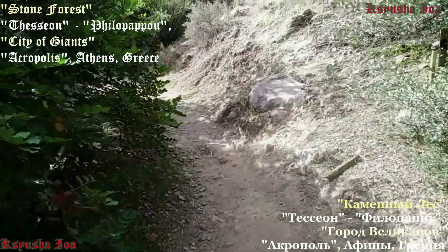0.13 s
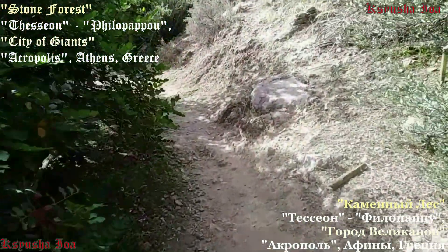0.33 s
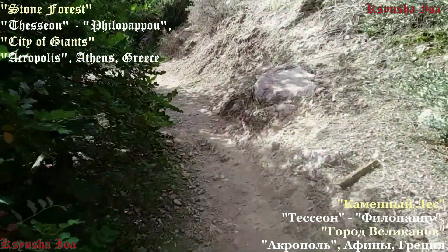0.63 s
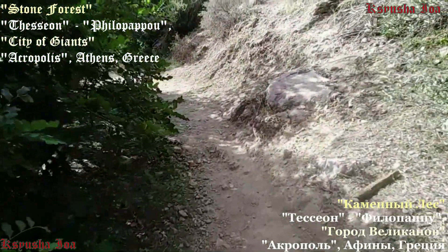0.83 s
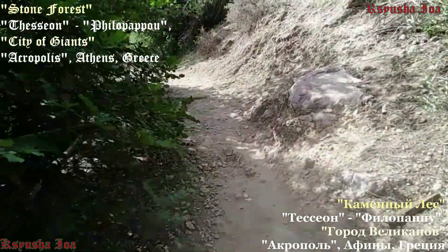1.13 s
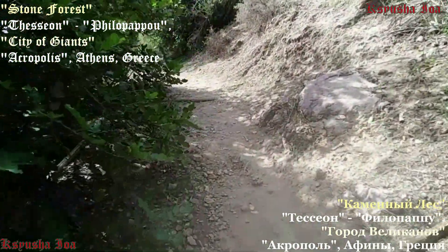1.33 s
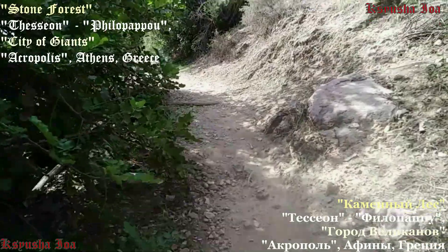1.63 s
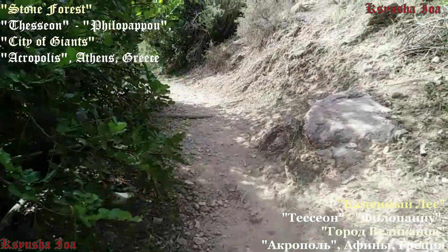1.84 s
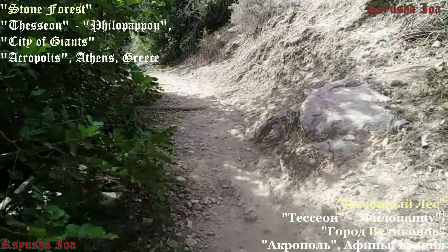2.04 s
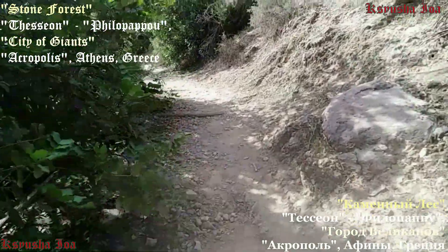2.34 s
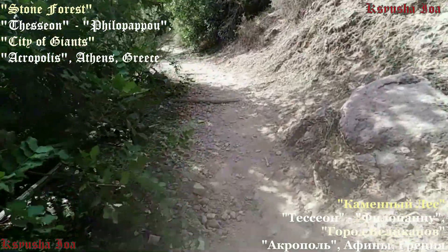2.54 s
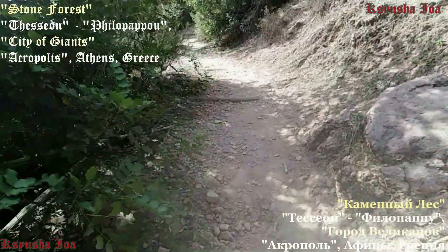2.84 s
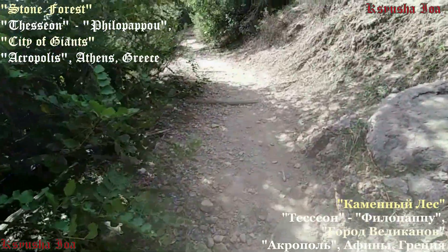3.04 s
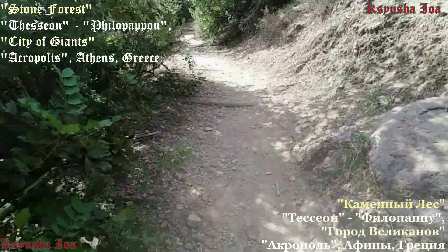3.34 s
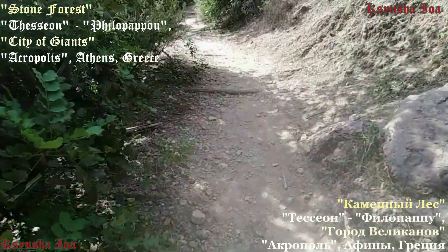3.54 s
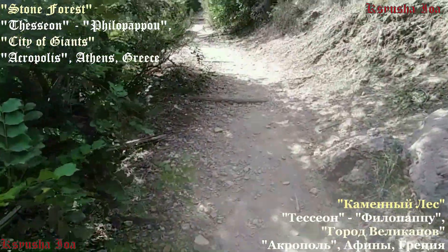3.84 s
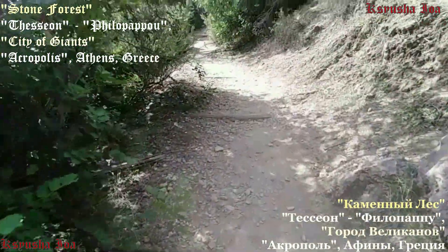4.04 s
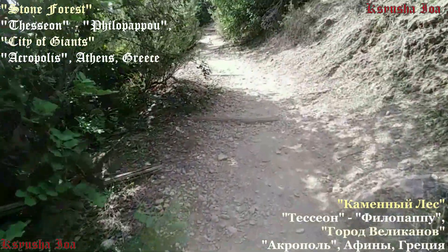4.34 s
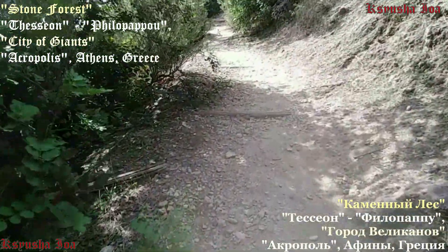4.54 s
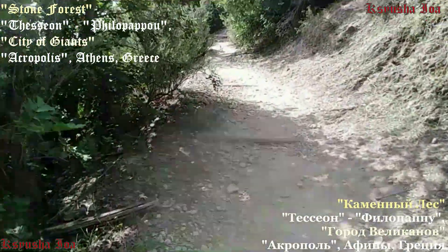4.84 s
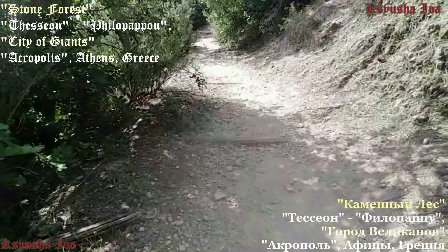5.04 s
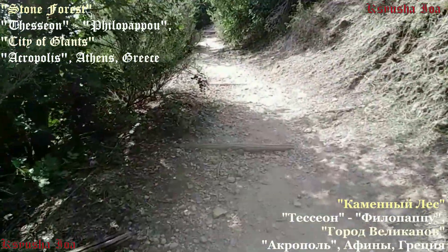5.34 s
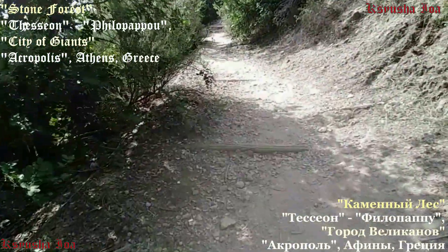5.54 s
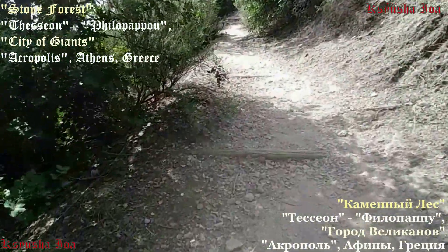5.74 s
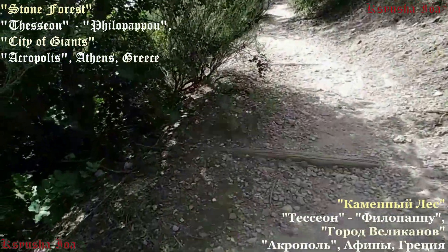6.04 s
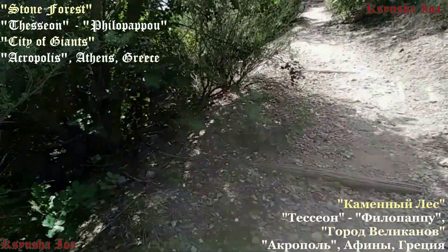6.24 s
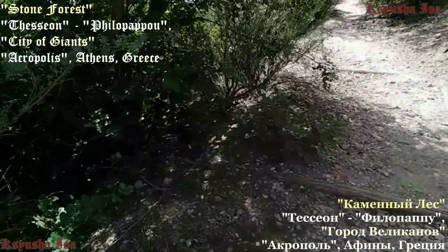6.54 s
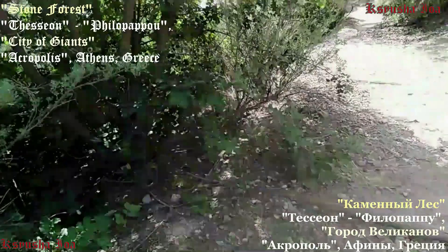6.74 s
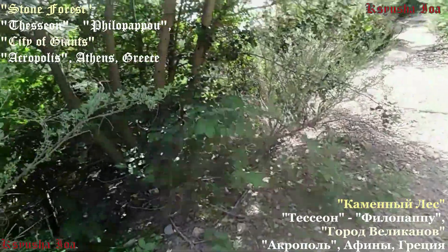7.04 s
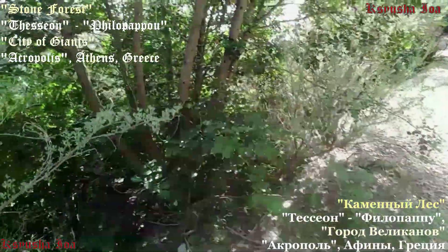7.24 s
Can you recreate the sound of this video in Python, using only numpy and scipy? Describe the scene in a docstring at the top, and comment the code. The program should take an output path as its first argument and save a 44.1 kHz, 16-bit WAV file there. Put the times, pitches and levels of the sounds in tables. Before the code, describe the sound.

Woodland birds around a path, heard in stereo, the nearest almost dry and the deeper singers blurred by leafy echoes. From 0 to 1.25 s a small bird trills in fast bent high sweeps, with a hoarse crow caw at the start, a nasal jackdaw-like yelp and sharp ticks. A second hoarse caw spans 1.2-1.75 s amid more yelps and a clear chirp. Buzzy thrush-like whistles follow, then a run of quick falling notes from 2.3 to 2.65 s and a short third caw. A thin, far mew slides down about an octave at 3.1-4 s. Sparse pips, faint twitters and yelps continue, with strong yelps at 3.4 and 5.45 s. A longer, brighter rattling caw fills 6.15-6.9 s, with the loudest yelps around 6.5 s, then soft trills and pips to 7.4 s. Faint distant chorus, steady air, deep hum and low buffeting, which eases between about 4.2 and 5.8 s, lie underneath.

```python
"""Jackdaw-like birds yelp close to the microphones on a wooded path: harmonics whose pitch may break. A crow
caws four times as a rattling pulse train through a throat; a small bird trills in fast bent sweeps. A thrush-
like bird whistles deeper among the trees, one far mew slides down, and a few brief clicks sound. Decaying noise
tails blur and echo the calls among the trees; shaped noise makes the distant chorus, the still air, the deep
hum and the low buffeting."""
import sys
import numpy as np
from scipy import signal
from scipy.fft import rfft, irfft
from scipy.io import wavfile
from scipy.ndimage import uniform_filter1d

SR = 44100
rng = np.random.default_rng(int(sys.argv[2]) if len(sys.argv) > 2 else 0)


def generate_wav(sig):
    """Save sig (samples, or channels by samples) to the path in sys.argv[1] as 16-bit PCM at SR."""
    pcm = np.round(np.clip(np.atleast_2d(sig).T, -1, 1) * 32767).astype(np.int16)
    wavfile.write(sys.argv[1], SR, pcm)


N = 325899
TIME = np.arange(N) / SR


def amp(db):
    """Decibels to gain."""
    return 10 ** (np.asarray(db) / 20)


def unit(x):
    """Scales to rms 1."""
    return x / np.sqrt(np.mean(abs(x) ** 2) + 1e-20)


def read(points, hz):
    """Reads a spectrum on a log-frequency axis."""
    f, value = np.transpose(points)
    return np.interp(np.log(hz + 1), np.log(f + 1), value)


def follow(rows, t):
    """Reads every column of a curve at the times t."""
    s, *columns = np.transpose(rows)
    return [np.interp(t, s, c) for c in columns]


def add(mix, s, sound):
    """Mixes a stereo sound in at time s."""
    part = mix[:, max(round(s * SR), 0):][:, :sound.shape[1]]
    part += sound[:, :part.shape[1]]


def wander(t, rate_hz):
    """Smooth chance of rms 1 along t, for sounds up to a second long."""
    hz = np.fft.rfftfreq(SR, 1 / SR)
    smooth = irfft(rfft(rng.standard_normal(SR)) * np.exp(-(hz / rate_hz) ** 2))
    return np.resize(unit(smooth), len(t))


def arch(length, start, middle, end):
    """Time and pitch of a note that bends through three pitches."""
    t = np.arange(int(length * SR)) / SR
    parabola = np.polyfit([0, .5, 1], [start, middle, end], 2)
    return t, np.polyval(parabola, t / length)


def swell(t, rise, fall):
    """Rounded onset and ending of a note, in seconds."""
    onset = np.sin(np.pi / 2 * np.clip(t / rise, 0, 1)) ** 2
    ending = np.sin(np.pi / 2 * np.clip((t[-1] - t) / fall, 0, 1)) ** 2
    return onset * ending


def voice(hz, partials, pan_db, lead_ms):
    """Harmonics of a pitch curve with the given gains, as they reach the two microphones."""
    side = np.array([[.5], [-.5]])  # left, right
    lead = lead_ms / 1000
    turn = np.exp(2j * np.pi * (np.cumsum(hz) / SR + side * lead * hz))
    wave, overtone = 0, 1
    for k, gain in enumerate(partials, 1):
        overtone = overtone * turn * np.exp(1j * k)  # each harmonic has its own phase
        wave = wave + (gain * overtone).real * (k * hz < SR / 2)
    return np.sqrt(2) * amp(side * pan_db) * wave


# likeness of the air noise at the two microphones: (f/Hz, coherence from 0 to 1)
LIKENESS = [(100, 1), (450, 0.91), (1000, 0.64), (1900, 0.0022), (4000, 0), (8000, 0.28)]


def wash(spectrum, patchy_db):
    """Stereo noise of a given colour with drifting patches; alike on both sides in the bass."""
    hz = np.fft.rfftfreq(1024, 1 / SR)
    a, b, c, d, patches = rng.standard_normal((5, len(hz), N // 256 + 5))
    patches = uniform_filter1d(patches, size=14, axis=1)  # smooth in time
    patches = unit(uniform_filter1d(patches, size=7, axis=0))  # and in frequency
    same = np.clip(read(LIKENESS, hz), -1, 1)[:, None]
    left = a + 1j * b
    right = same * left + np.sqrt(1 - same ** 2) * (c + 1j * d)
    z = np.array([left, right])
    z *= amp(read(spectrum, hz)[:, None] + patchy_db * patches)
    return unit(signal.istft(z, nperseg=1024, noverlap=768)[1][:, :N])


# colour of the still air: (f/Hz, relative level per Hz/dB)
AIR = [(35, -30), (60, 14.5), (108, -11), (173, -8.5), (425, -9.5), (692, -16), (940, -14), (1500, -17.5),
       (1700, -14), (1960, -22), (2170, -9.5), (2830, -3.5), (3680, -11.5), (6010, -26.5), (7830, -34.5),
       (10200, -34), (17200, -120)]


def still_air():
    """Steady noise of the place, shaped in frequency."""
    return amp(-43.5) * wash(AIR, patchy_db=3.0)


# colour of the far birds: (f/Hz, relative level per Hz/dB)
CHORUS = [(1200, -25), (1900, -2.5), (2600, 7), (3300, -3), (4300, -5), (6000, -53), (9000, -50.5)]
# blur of far song and lingering echo, before the chorus trim: (t/s, level/dB)
CHORUS_LEVEL = [(0, -20), (.78, -30), (1.4, -43), (2.53, -57), (2.78, -21), (3.09, -39), (3.52, -36),
                (3.8, -50.5), (4.45, -45), (5.45, -36.5), (6.24, -58), (6.68, -29), (6.96, -44.5),
                (7.39, -31)]


def far_chorus(trim_db=-3):
    """Many far birds merge into coloured noise whose level comes and goes."""
    return amp(follow(CHORUS_LEVEL, TIME)[0] + trim_db) * wash(CHORUS, patchy_db=2.5)


# deep hum of the open air: (f/Hz, relative level per Hz/dB)
LOW_AIR = [(15, -15.5), (40, -7.5), (60, -3.5), (90, -16), (200, -37.5)]


def low_hum():
    """Steady deep hum of the open air, as low noise."""
    return amp(-58) * wash(LOW_AIR, patchy_db=2.0)


# colour of the low buffeting: (f/Hz, relative level per Hz/dB)
RUMBLE = [(3, -5), (10, 6.5), (18, -5.5), (30, -16), (60, -20.5), (120, -42), (300, -65)]
# strength of the low buffeting: (t/s, level/dB)
RUMBLE_LEVEL = [(0, -39), (.85, -32.5), (1.45, -29.5), (2.3, -34), (3.3, -34), (3.75, -35), (4.12, -35.5),
                (4.24, -59), (5.6, -69), (5.86, -43.5), (6.02, -56), (6.2, -39), (7, -31.5), (7.39, -35.5)]


def buffeting():
    """Slow low rumble of air, the same at both microphones."""
    colour = amp(read(RUMBLE, np.fft.rfftfreq(N, 1 / SR)))
    rumble = unit(irfft(rfft(rng.standard_normal(N)) * colour, N))
    return amp(follow(RUMBLE_LEVEL, TIME)[0]) * rumble


def caw(rows, throat, rest_hz, rough, jitter, flutter_hz, flutter, lumpy, level_db, lead_ms):
    """A rattling pulse train through a throat that shifts as the beak opens; higher harmonics are rougher."""
    t = np.arange(rows[0][0], rows[-1][0], 1 / SR)
    pitch_hz, effort_db, resonance_hz = follow(rows, t)
    rattle_hz = flutter_hz * (1 + lumpy * wander(t, 30))
    rattle = signal.sawtooth(2 * np.pi * np.cumsum(rattle_hz) / SR, .8)
    depth = np.linspace(*flutter, len(t))  # the rattle changes from the start of the call to its end
    hz = pitch_hz * (1 + depth * rattle + jitter * wander(t, 300))
    mouth = np.sqrt(resonance_hz / rest_hz)  # the whole throat shifts by the root of the ratio
    partials = []
    for k in range(1, 32):
        scatter = rough * k / 4 * (wander(t, 130) + 1j * wander(t, 130))
        partials.append(amp(read(throat, k * hz / mouth)) * unit(1 + scatter))
    throb = 1 + lumpy * (rattle + .6 * wander(t, 60))
    tone = unit(voice(hz, partials, 0, lead_ms) * throb)
    return t[0], amp(effort_db + level_db) * swell(t - t[0], 0.0023, 0.023) * tone


# one curve a caw: (t/s, pitch f/Hz, effort before the call's trim/dB, main throat resonance f/Hz)
CAWS = [
    [(0, 279.7, -15.5, 1170), (.09, 260.4, -21.5, 1317), (.16, 245.7, -22, 1200), (.23, 233.3, -23.5, 1200),
     (.365, 220.3, -25.5, 1240), (.4, 217, -35, 1220)],
    [(1.215, 291, -33.5, 1340), (1.25, 293.6, -19, 1426), (1.34, 302.2, -22, 1200),
     (1.43, 276, -19.5, 1380), (1.51, 269.3, -22, 1395), (1.62, 239.3, -22.5, 1310),
     (1.72, 219, -30.5, 1140), (1.76, 211, -36.5, 1150)],
    [(2.655, 242.4, -35, 1170), (2.685, 250.4, -29.5, 970), (2.76, 267.5, -21.5, 1156),
     (2.835, 278, -22, 1305), (2.9, 241, -23, 1080), (2.95, 234.7, -26.5, 1090), (3, 222, -33, 1220)],
    [(6.135, 260, -45, 1310), (6.169, 273, -29, 1360), (6.22, 318.4, -23.5, 1440),
     (6.3, 321.6, -22.5, 1460), (6.42, 313.3, -22, 1480), (6.52, 314.6, -21.5, 1560),
     (6.7, 292.5, -22, 1610), (6.88, 265.6, -22, 1345), (6.93, 248, -34, 1330)],
]
# throat of the three hoarse caws: (f/Hz, level/dB)
HOARSE_THROAT = [(250, -36.5), (550, -30), (800, -13.5), (1050, -4.5), (1220, 9), (1500, -5.5), (1900, -8),
                 (2500, -8.5), (3400, -22.5), (5000, -21), (7000, -61.5), (10000, -75)]
# throat of the long bright caw: (f/Hz, level/dB)
BRIGHT_THROAT = [(300, -38), (650, -35.5), (930, -11), (1250, -8), (1550, 6), (1900, -2), (2200, -5),
                 (2600, -0.5), (3500, -24), (4300, -22), (5200, -10.5), (6500, -26.5), (9000, -48.5)]


def crow():
    """Three hoarse, lumpy caws and one long, brighter one with an even rattle."""
    out = np.zeros((2, N))
    hoarse = dict(rough=.32, jitter=.018, flutter_hz=31, flutter=(.06, .04), lumpy=.3)
    even = dict(rough=.18, jitter=.01, flutter_hz=54, flutter=(.042, .08), lumpy=.05)
    for rows in CAWS[:-1]:
        add(out, *caw(rows, HOARSE_THROAT, rest_hz=1238, level_db=1.5, lead_ms=0.0067, **hoarse))
    add(out, *caw(CAWS[-1], BRIGHT_THROAT, rest_hz=1626, level_db=2, lead_ms=0.0018, **even))
    return out


def thicket(x, t60=0.27):
    """Nearby foliage blurs a call with a short spray of reflections."""
    t = np.arange(SR // 3) / SR
    spray = rng.standard_normal((2, len(t))) * amp(-60 * t / t60)
    spray *= t > .003  # the first reflection comes after 3 ms
    return signal.fftconvolve(x, spray / np.linalg.norm(spray[0]), axes=1)[:, :N]


# echo among the trees: (f/Hz, time to die by 60 dB/s)
WOOD = [(500, 0.89), (1300, 1.1), (2700, 1.57), (4200, 1.5), (6000, 0.98), (10000, 0.2)]


def trees(x, build_s=0.0013):
    """Trunks and leaves scatter a tail, different on each side, each band dying at its own speed."""
    hz, t, z = signal.stft(rng.standard_normal((2, 2 * SR)), SR, nperseg=256)
    t60 = read(WOOD, hz)[:, None]
    z = z * amp(-60 * t / t60) * (1 - np.exp(-t / build_s))
    tail = signal.istft(z, SR, nperseg=256)[1]
    return signal.fftconvolve(x.mean(0)[None], tail / np.linalg.norm(tail[0]), axes=1)[:, :N]


def chirp(length, pitches, db, pan_db, lead_ms, jitter=0.0081, rise=0.007, fall=0.014, overtone_db=-54):
    """A nearly pure sweep with rounded ends and a slightly uneven level."""
    t, hz = arch(length, *pitches)
    tone = voice(hz * (1 + jitter * wander(t, 500)), [1, amp(overtone_db)], pan_db, lead_ms)
    return amp(db) * unit(swell(t, rise, fall) * (1 + 0.23 * wander(t, 160))) * tone


# runs of the trill, levels before the trill's trim: (first t/s, last t/s, syllables, pitch scale,
# first level/dB, last level/dB, first left-right/dB, last left-right/dB, left lead/ms, kind of syllable)
TRILLS = [(0.019, .258, 4, 0.99, -17, -16, 3.5, 0, 0.033, "hook"),
          (0.335, 0.542, 4, 1, -19.5, -19.5, -3, -3, -0.011, "sweep"),
          (0.611, 1.246, 10, 0.99, -19.5, -30, -3, -2.5, -0.019, "sweep"),
          (6.741, 6.902, 3, 1, -28, -31, 0, .3, -0.028, "hook"),
          (6.981, 7.137, 3, 0.96, -25.5, -25.5, 1, 1, -0.044, "hook"),
          (7.213, 7.365, 3, 0.93, -30, -36, 1, -.5, -0.031, "sweep")]
# strokes of each kind, before the run's pitch scale:
# (delay t/s, length t/s, start f/Hz, middle f/Hz, end f/Hz, level relative to the run/dB)
SYLLABLES = {"hook": [(0, .036, 3860, 5100, 5250, 0), (.033, 0.025, 6760, 5450, 3900, -9.5)],
             "sweep": [(0.00098, .038, 4100, 5230, 6530, 0.5)]}


def trills(trim_db=-1.0):
    """Evenly repeated syllables: two-stroke hooks, or plain upward sweeps."""
    out = np.zeros((2, N))
    for first, last, count, scale, first_db, last_db, first_pan, last_pan, lead_ms, kind in TRILLS:
        for u in np.linspace(0, 1, round(count)):
            start = first + u * (last - first)
            db = trim_db + first_db + u * (last_db - first_db)
            pan_db = first_pan + u * (last_pan - first_pan)
            for delay, length, *pitches, stroke_db in SYLLABLES[kind]:
                stroke = chirp(length, scale * np.array(pitches), db + stroke_db, pan_db, lead_ms)
                add(out, start + delay, stroke)
    return out


# throat of the yelping birds: (f/Hz, level/dB)
YELP_THROAT = [(3000, -11.5), (4000, -4.5), (5200, -10.5), (6600, -13.5), (8000, -29), (10000, -36.5),
               (13000, -75), (16000, -65)]
# shares of the pitch gained in the rise, lost per second held, and lost in the close
YELP_SCOOP, YELP_SAG_PER_S, YELP_CLOSE = .25, 2.725, .29
# fundamental of a full-scale yelp/dB, and its change per dB of level: softer yelps carry more of it
ROOT_DB, ROOT_PER_DB = -21.5, -0.52


def yelp(rise_s, hold_s, close_s, top_hz, drop, db, held_db, odd_db, treble_db, pan_db, lead_ms,
         jitter=0.011, shimmer=0.25, rise=0.0021, fall=0.0055, rasp_db=-29, creak=0.57, creak_decay=0.012,
         open_odd_db=4, held_root_db=-28, close_db=-5, catch=0.44, catch_s=0.0024, tire_db=-5):
    """A nasal yelp led by its second harmonic; a break in the voice changes pitch and odd harmonics."""
    t = np.arange(int((rise_s + hold_s + close_s) * SR)) / SR
    since = t - rise_s
    breaks = hold_s > .005
    closing = (close_s > .005) * np.clip((since - hold_s) / max(close_s, .005), 0, 1)
    holding = np.clip(since / (hold_s + 1e-9), 0, 1)
    held = breaks * (since > 0) * (closing == 0)
    bend = (1 - YELP_SCOOP * np.minimum(since / rise_s, 0) ** 2) * (1 - YELP_CLOSE * closing ** 2)
    bend *= 1 - YELP_SAG_PER_S * hold_s * held * holding ** 2.43
    register = np.where(breaks * (since > 0), drop, 1)
    hz = top_hz * bend * register * (1 + jitter * wander(t, 460))
    held = uniform_filter1d(held * 1., size=60)
    odd = open_odd_db + held * (odd_db - open_odd_db)
    root = amp((ROOT_DB + ROOT_PER_DB * db) * (1 - held) + held_root_db * held)
    upper = [amp(read(YELP_THROAT, k * hz) + treble_db + odd * (k % 2)) for k in np.arange(3, 12)]
    tone = voice(hz, [root, 1] + upper, pan_db, lead_ms)
    # just after a break the voice creaks, repeating only every third cycle of its strongest line
    tripled = (odd_db < -6) * held * np.cos(2 * np.pi * np.cumsum(hz * 2 / 3) / SR)
    creaking = creak * np.exp(-abs(since) / creak_decay) * tripled
    tone *= 1 + shimmer * wander(t, 110) + amp(rasp_db) * wander(t, 2500) + creaking
    # the voice weakens as the pitch sinks, and catches at each change of register
    weakening_db = 20 * np.log(bend) + breaks * close_db * np.sqrt(closing)
    pressure = amp(weakening_db + tire_db * held * holding ** 4)
    for change in (0, hold_s):
        pressure *= 1 - breaks * catch * np.exp(-((since - change) / catch_s) ** 2)
    return amp(db + held_db * held) * unit(pressure * swell(t, rise, fall)) * tone


# a yelp rises, may break into a held register, and may close with a quick fall; level before the trim:
# (t/s, rise t/s, hold t/s, close t/s, top f/Hz, held pitch as a share of the top, level/dB,
# held part relative level/dB, its odd harmonics relative level/dB, treble/dB, left-right/dB, left lead/ms)
YELPS = [(0.052, 0.017, 0.038, 0.029, 1800, 0.76, -25.5, 9, -10, -10, 4, -0.024),
         (.792, 0.02, 0.0066, 0.036, 1552, 1, -26, 0, 7, 0.5, -1.5, 0.044),
         (1.25, 0.028, 0.058, 0.0044, 1715, 0.76, -19.5, 3, -13, -2.5, 0, 0.047),
         (1.393, 0.026, 0.047, 0.0033, 1590, .79, -25.5, 6.5, -26, 3, -1, 0.056),
         (1.495, 0.025, 0.0017, 0.033, 1602, 1, -24.5, 17, -1, -10.5, 0.5, 0.027),
         (2.242, 0.022, 0.034, 0.012, 1681, .81, -19, 2, -3.5, -3, 4.5, -0.067),
         (3.43, .023, 0.043, 0.007, 1654, 0.81, -18, -2.5, -10, -1.5, 5.5, -0.077),
         (4.277, 0.03, 0.00064, 0.04, 1643, 1, -25.5, -4, -5, -4, 6.5, 0.074),
         (4.637, 0.032, .034, 0.0045, 1437, 0.76, -31.5, 6, -16, -15, 10, 0.2),
         (5.389, 0.031, 0, 0.05, 1406, 1, -60, -3, 0, -13, 4, 0.018),
         (5.459, .021, .039, .013, 1720, .772, -16, 1.5, -1, 5, -1, .031),
         (5.792, 0.029, 0, 0.033, 1310, 1, -52.5, 0, 0, -6, 3.5, 0.0017),
         (5.958, 0.024, 0.043, 0.0047, 1411, .775, -42.5, 11, -16, -5, 5.5, 0.04),
         (6.468, 0.017, 0.038, 0.0042, 1578, 0.84, -17.5, 0.5, -4.5, 0.5, -1, 0.016),
         (6.515, 0.038, 0.049, 0.0063, 1680, 0.75, -12.5, 1, -6, -0.5, 0, .007),
         (6.671, 0.027, 0.04, 0.0072, 1518, 0.75, -21, -2, -11, 2.5, 0, .006)]


def yelps(trim_db=1):
    """The yelping birds close by, each call placed by level and arrival at the two microphones."""
    out = np.zeros((2, N))
    for s, *shape in YELPS:
        add(out, s, amp(trim_db) * yelp(*shape))
    return out


# single near chirps, level before the trim:
# (t/s, length t/s, start f/Hz, end f/Hz, level/dB, left-right/dB)
CHIRPS = [(0.129, .033, 3920, 2840, -22.5, 5.5), (.282, 0.041, 2580, 3130, -15.5, 7.5),
          (0.414, .032, 3470, 4300, -23.5, 5), (1.557, 0.018, 3450, 3460, -27, 1),
          (1.6, 0.018, 2900, 3750, -29.5, 8), (1.608, 0.051, 3684, 3680, -14, 1),
          (5.256, 0.056, 4680, 3380, -35, 5), (5.881, 0.05, 3420, 6050, -40, 2),
          (6.087, .04, 3360, 5800, -39, 1), (6.117, 0.021, 3250, 3760, -30, -1),
          (6.356, 0.057, 4680, 3340, -35, 5), (6.746, 0.028, 4900, 4030, -29, -1),
          (6.92, 0.035, 3646, 2120, -29.5, 4), (7.093, 0.035, 4530, 3800, -31.5, 4)]


def chirps(bow=1.005, trim_db=-1):
    """Single glides close by, slightly bowed upward in pitch."""
    out = np.zeros((2, N))
    for s, length, start, end, db, pan_db in CHIRPS:
        pitches = (start, bow * (start + end) / 2, end)
        add(out, s, chirp(length, pitches, db + trim_db, pan_db, lead_ms=0.01))
    return out


# small sharp ticks: (t/s, level/dB, centre f/Hz)
TICKS = [(.298, -40, 8000), (.712, -28, 7600), (1.655, -33.5, 5200)]


def ticks(decay_s=0.0013):
    """Brief clicks: a tone roughened by chance that dies within milliseconds."""
    out, t = np.zeros((2, N)), np.arange(SR // 100) / SR
    for s, db, hz in TICKS:
        add(out, s, amp(db) * np.exp(-t / decay_s) * wander(t, 3100) * voice(hz + 0 * t, [1], 0, 0))
    return out


def whistle(length, pitches, db, warble, pan_db, warble_hz=75, lead_ms=0.06, rise=0.0067, fall=0.0082,
            second_db=-34, third_db=-42):
    """A whistled note, steady or shaken into a buzzy warble."""
    t, hz = arch(length, *pitches)
    shake = np.sin(2 * np.pi * warble_hz * t) + 0.498 * wander(t, 354)
    shake *= np.sqrt(2 * t / length)  # a note starts clean and spreads
    tone = voice(hz * (1 + warble * shake), [1, amp(second_db), amp(third_db)], pan_db, lead_ms)
    return amp(db) * unit(swell(t, rise, fall) * (1 + 0.037 * wander(t, 55))) * tone


# slurred notes from deeper in the wood, level before the mix:
# (t/s, length t/s, start f/Hz, end f/Hz, level/dB, warble scale as a share of the pitch)
SONG = [(1.702, 0.035, 2880, 2990, -24, 0.022), (1.742, 0.044, 3130, 3200, -21.5, 0.099),
        (1.865, 0.086, 3100, 2875, -35, 0.069), (1.866, 0.045, 4850, 4570, -37, 0.081),
        (1.934, 0.0438, 2500, 2936, -26, 0.017), (1.972, 0.022, 3200, 3364, -25.5, 0.11),
        (1.991, .032, 2600, 2860, -24.5, 0.068), (2.088, 0.061, 3250, 2610, -24, 0.068),
        (2.131, 0.064, 2800, 2087, -26.5, 0.084), (2.76, 0.03, 3150, 3690, -19, .003),
        (2.78, 0.035, 2540, 2803, -21.5, .09), (2.855, 0.089, 2750, 2404, -21.5, 0.19),
        (3.096, 0.05, 2850, 2903, -30.5, 0.029), (3.669, 0.081, 2850, 2830, -37, 0.027),
        (3.843, 0.061, 3030, 3140, -38.5, 0.013), (3.97, 0.055, 2125, 2340, -46, .019),
        (4.01, 0.051, 4770, 4520, -46.5, 0.05), (4.162, 0.16, 2890, 2870, -33, 0.05),
        (4.494, 0.065, 4750, 4393, -26.5, 0.034), (5.048, 0.067, 2750, 2834, -34.5, 0.034),
        (6.863, 0.062, 3000, 2768, -27.5, 0.0051), (6.943, 0.039, 2320, 2347, -33, 0.0043),
        (7.051, 0.039, 2250, 2350, -36, .004), (7.185, 0.027, 1940, 1804, -32.5, 0.003)]


def song(bow=0.98):
    """A thrush-like bird among the trees: slurred whistles, slightly bowed downward in pitch."""
    out = np.zeros((2, N))
    for s, length, start, end, db, warble in SONG:
        pitches = (start, bow * (start + end) / 2, end)
        add(out, s, whistle(length, pitches, db, warble, pan_db=-.3))
    return out


# strokes of the falling run, high and low in turn: (length t/s, start f/Hz, middle f/Hz, end f/Hz)
RUN_STROKES = [(.024, 2670, 2250, 1270), (.027, 3600, 2870, 2250)]
RUN_START_S, RUN_STEP_S = 2.303, .0555
RUN_DB, RUN_GROWTH_DB_PER_S = -28, 10  # before the mix


def falls(count=7, uneven_db=1.4):
    """A run of quick falling whistles, growing louder with uneven strokes."""
    out = np.zeros((2, N))
    for k in range(count):
        length, *pitches = RUN_STROKES[k % 2]
        elapsed = k * RUN_STEP_S
        db = RUN_DB + RUN_GROWTH_DB_PER_S * elapsed + uneven_db * rng.standard_normal()
        add(out, RUN_START_S + elapsed, whistle(length, pitches, db, warble=0.016, pan_db=-0.5))
    return out


# the long falling mew: (t/s, pitch f/Hz, level/dB)
MEW = [(3.11, 1000, -47), (3.189, 1177, -41), (3.35, 1150, -46), (3.501, 1045, -52), (3.631, 999, -48),
       (3.7, 880, -44.5), (3.779, 784, -51), (3.821, 670, -46.5), (3.97, 594, -59)]
# throat of the mew: (f/Hz, level/dB)
MEW_THROAT = [(600, -17), (900, -13), (1200, -3), (2000, -4), (3000, 0), (3700, -4), (4200, 5),
              (4700, -13.5), (5300, -35), (7000, -40)]


def mew():
    """One thin, far call whose harmonics slide down through about an octave."""
    out, t = np.zeros((2, N)), np.arange(MEW[0][0], MEW[-1][0], 1 / SR)
    hz, db = follow(MEW, t)
    hz = hz * (1 + 0.007 * wander(t, 84))
    softness = hz / hz.max()  # the call grows purer as it sinks
    partials = [amp(read(MEW_THROAT, k * hz)) * softness ** max(k - 2, 0) for k in range(1, 7)]
    add(out, t[0], amp(db) * swell(t - t[0], 0.025, 0.016) * voice(hz, partials, 0, 0))
    return out


# steady pips, level before the mix: (t/s, length t/s, level/dB)
PIPS = [(3.926, 0.068, -32), (4.778, 0.046, -38), (4.906, 0.048, -42.5), (6.091, 0.041, -32),
        (7.164, 0.047, -26), (7.211, 0.025, -25)]
PIP_HZ = 3427


def pips():
    """Steady whistled pips on one pitch among the trees."""
    out = np.zeros((2, N))
    for s, length, db in PIPS:
        add(out, s, whistle(length, (PIP_HZ, PIP_HZ, PIP_HZ), db, warble=.003, pan_db=3))
    return out


def twitter(count=6, span_s=(4.1, 5.4), range_hz=(3200, 4900)):
    """Faint stray falling notes of other birds, at chance times and pitches."""
    out = np.zeros((2, N))
    for when, height in rng.random((count, 2)):
        s = np.interp(when, [0, 1], span_s)
        hz = np.interp(height, [0, 1], range_hz)
        add(out, s, whistle(.055, (hz, .94 * hz, .9 * hz), db=-43, warble=.04, pan_db=-1))
    return out


def scene():
    """Near birds are nearly dry; the singers among the trees are blurred and wet."""
    yelping, caws, falling = yelps(), crow(), falls()
    chirping = trills() + chirps()
    singing = song() + pips() + twitter()
    # leaves scatter the high sweeps far more than the lower chirps
    highpass = signal.ellip(6, .5, 50, 4200, "high", fs=SR, output="sos")
    high_sweeps = signal.sosfilt(highpass, chirping)
    blur = thicket(amp(-3.5) * singing + amp(-0.5) * falling + amp(-43.5) * caws + amp(-19.5) * yelping)
    echo = trees(amp(-40.5) * yelping + amp(-7.5) * high_sweeps + amp(-5.0) * singing
                 + amp(-5.5) * falling + amp(-36) * caws)
    near = yelping + chirping + caws + ticks()
    deeper = amp(-3.0) * singing + amp(-1.5) * falling + mew()
    background = still_air() + far_chorus() + low_hum() + buffeting()
    return near + deeper + blur + echo + background


def record(dry, edge_hz=13500):
    """The microphone signals clip at full scale; then a lowpass limits the band."""
    lowpass = signal.firwin(511, edge_hz, window=("kaiser", 9), fs=SR)
    return signal.oaconvolve(np.clip(dry, -1, 1), lowpass[None], "same")


dry = scene()
out = record(dry)
generate_wav(out)
```